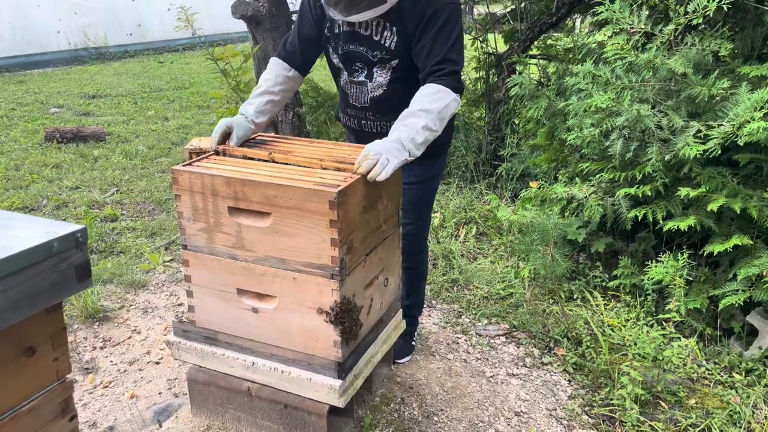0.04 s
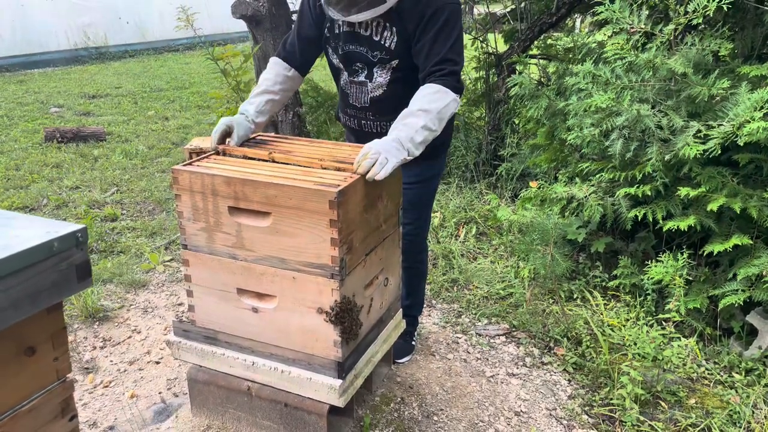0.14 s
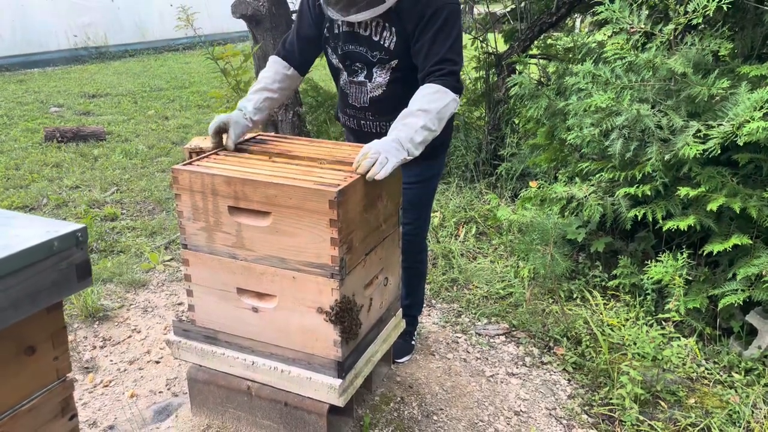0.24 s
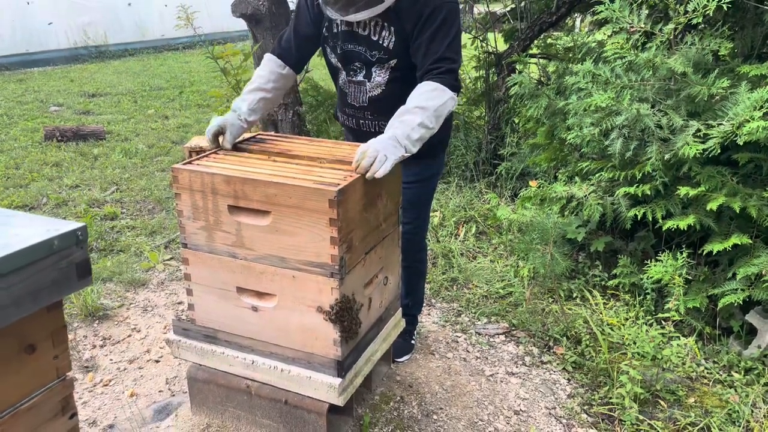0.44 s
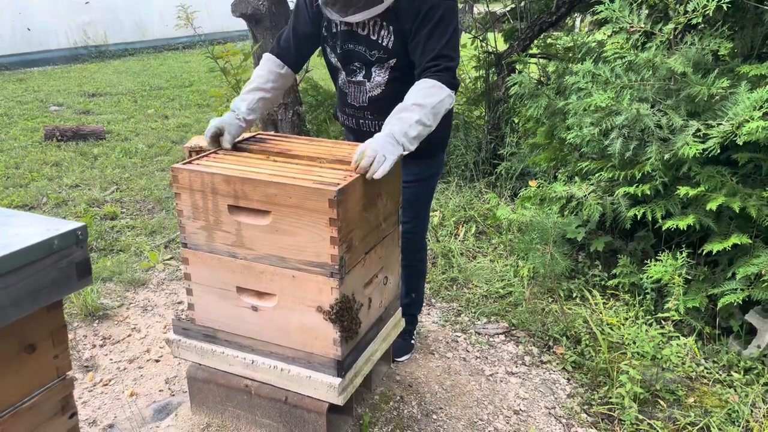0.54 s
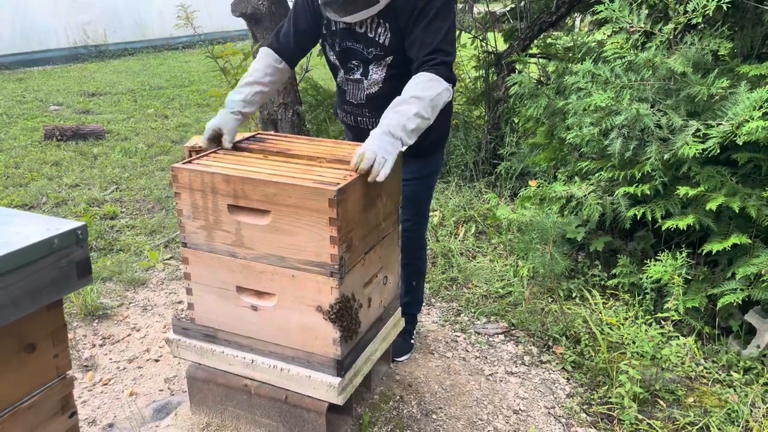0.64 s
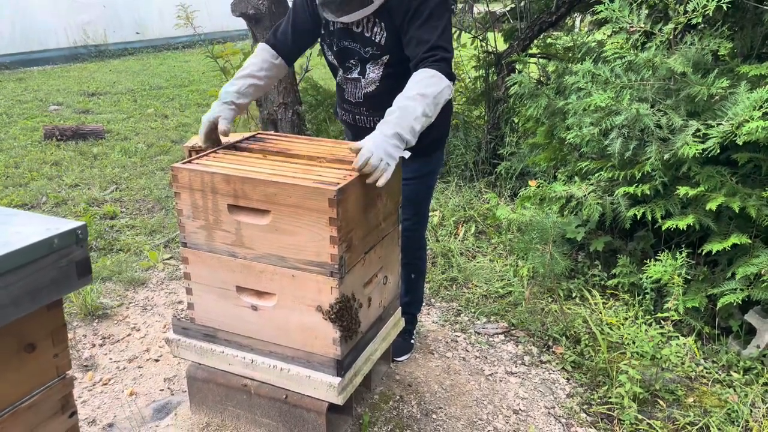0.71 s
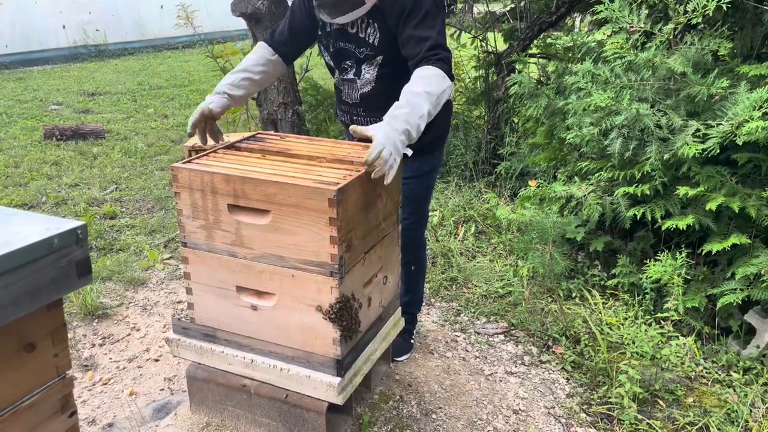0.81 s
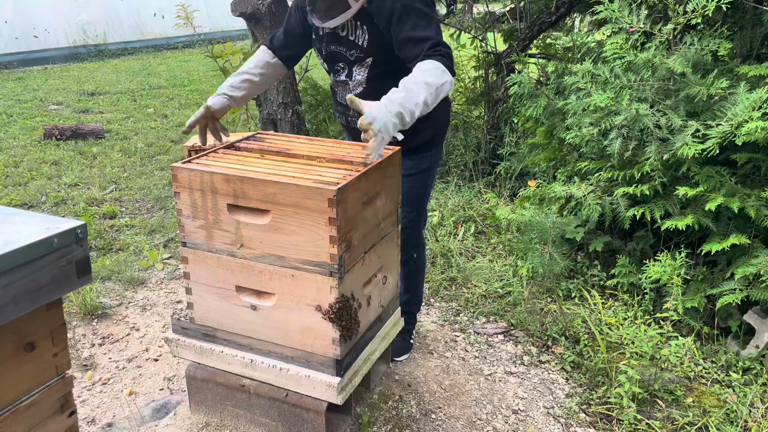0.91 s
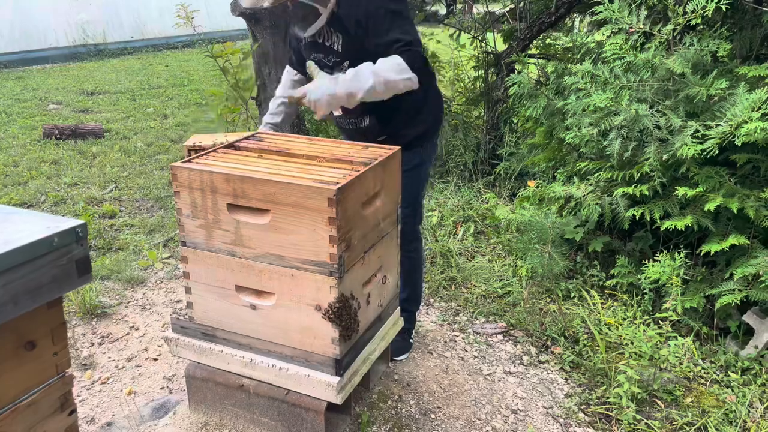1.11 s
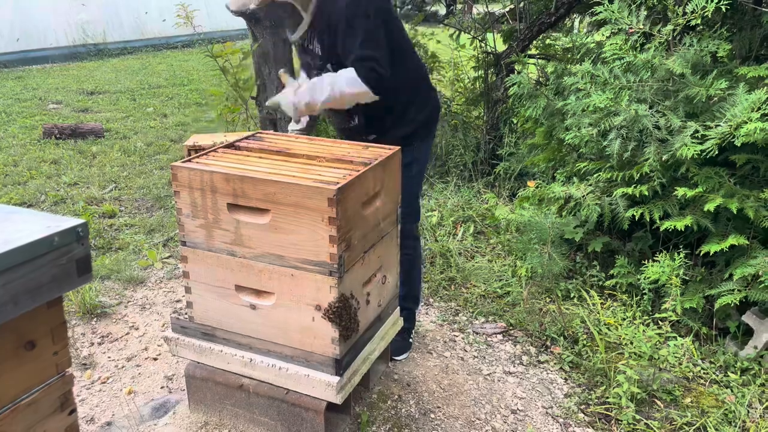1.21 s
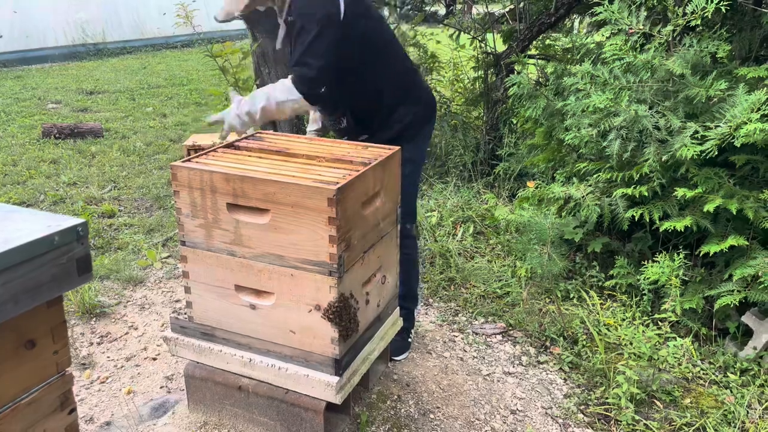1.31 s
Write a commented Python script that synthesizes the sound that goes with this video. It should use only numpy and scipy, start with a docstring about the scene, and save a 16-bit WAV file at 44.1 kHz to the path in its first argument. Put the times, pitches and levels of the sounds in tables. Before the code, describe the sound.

A dull wooden knock on a beehive, then the bees' hum swells and settles outdoors

```python
"""Bees hum around an open wooden hive, in a soft outdoor hiss with a cricket far off.
A wooden part is set down: a touch, a crack and a dull knock, then the colony's hum swells and settles.
A glove rubs, scrapes and bumps over the wood, and sticky frames tick and tap.
Bees are stacks of wandering overtones, wood is short fading tones, and the hiss, the breeze, the rubbing
and the ticks are filtered noise. The cricket is a row of short falling whistles."""
import sys
import numpy as np
from scipy import signal
from scipy.fft import rfft, irfft
from scipy.io import wavfile
from scipy.ndimage import uniform_filter1d, map_coordinates

SR = 44100
rng = np.random.default_rng(int(sys.argv[2]) if len(sys.argv) > 2 else 0)


def master_out(mix):
    """Clip the mix to full scale and print it as 16-bit PCM to the path in sys.argv[1]."""
    frames = np.transpose(np.atleast_2d(mix))
    ceiling = np.clip(frames, -1, 1)
    pcm = np.round(ceiling * 32767).astype(np.int16)
    wavfile.write(sys.argv[1], SR, pcm)


N = 59535
T = np.arange(N) / SR
FREQS = np.fft.rfftfreq(2 * N, 1 / SR)

# when the wooden part first touches the hive [s]
TOUCH_S = 0.2245
# overtones of the bees on the frames: (multiple of the wingbeat, level [dB])
COLONY_OVERTONES = [(1, 3), (2, -21.5), (3, -25), (4, -25), (5, -22.5), (7, -24), (12, -42), (20, -50)]


def amp(db):
    """Turns decibels into gain."""
    return 10 ** (np.asarray(db) / 20)


def unit(x):
    """Scales to an rms of one."""
    return x / np.sqrt(np.mean(x ** 2) + 1e-20)


def read(points, hz, axis=1):
    """Reads a column of a table, with the first column on a logarithmic axis."""
    p = np.transpose(points)
    return np.interp(np.log(hz + 1), np.log(p[0] + 1), p[axis])


def curve(points, axis=1):
    """Reads a column of a table over time."""
    p = np.transpose(points)
    return np.interp(T, p[0], p[axis])


def pan(db):
    """Gains of left and right that differ by this many decibels; positive is louder on the left."""
    return amp([[db / 2], [-db / 2]])


def drift(knots_per_s):
    """Smooth random wandering through chance values, with an rms of about one."""
    knots = rng.standard_normal(200)
    places = 10 + T[::100] * knots_per_s
    # each value is held for 100 samples
    return map_coordinates(knots, [places], order=3, mode="wrap").repeat(100)[:N]


def colour(x, tone, tilt_db=0):
    """Filters by a spectrum in dB, tilted toward the treble; the filter's own gain has an rms of one."""
    gain = amp(read(tone, FREQS) + tilt_db * np.log2(1 + FREQS / 1000))
    return irfft(rfft(x, 2 * N) * unit(gain))[:N]


def ports(pair):
    """Mixes two unrelated sounds into one diffuse sound at two microphone ports, by likeness and phase."""
    # (pitch [Hz], likeness of the two ports [0-1], phase by which left leads [rad])
    likeness = [(60, 0.96, -0.2), (290, 0.94, -0.35), (640, 0.83, 0.16), (1420, 0.61, 0.2),
                (2970, 0.36, 0.87), (4500, 0.6, 0), (6130, 0.33, 0), (7700, 1, -3), (8870, 1, -3.5),
                (10260, 0.72, -5.5), (12000, 1, -6.5), (12800, 0.71, -8.5), (14400, 0.8, -10),
                (16000, 0.85, -9.5)]
    left, other = rfft(np.array(pair), 2 * N)
    same = np.clip(read(likeness, FREQS), -1, 1)
    right = same * left + np.sqrt(1 - same ** 2) * other
    right = right * np.exp(-1j * read(likeness, FREQS, axis=2))
    return irfft(np.array([left, right]))[:, :N]


def direct(x):
    """Sound straight from the hive, a little to the right: it reaches the left port later."""
    left_lag_s = 0.00016
    turn = np.exp(np.pi * 1j * FREQS * left_lag_s * np.array([[-1], [1]]))
    return irfft(rfft(x, 2 * N) * turn)[:, :N]


def air():
    """Outdoor hiss: filtered noise with faint patches that drift in time and pitch."""
    # spectrum: (pitch [Hz], relative level [dB per Hz])
    hiss_tone = [(20, -37), (32, -17), (48, -5), (70, -0.5), (130, -2.5), (280, -4), (420, 1), (650, -4),
                 (1000, 0), (1700, -6), (2800, -8), (4500, -9), (7000, -13.5), (8300, -8.5), (9300, -15),
                 (11700, -16), (13500, -19), (14300, -25), (15700, -35)]
    # lean to one side: (pitch [Hz], left minus right [dB])
    lean = [(500, -0.5), (1600, -1.5), (2100, 2), (3000, 4.5), (4300, -0.5), (6000, 0), (12000, -0.5)]
    level_db, patchy_db = -57.5, 1.5
    z = signal.stft(rng.standard_normal((2, N)), nperseg=512)[2]
    patches = uniform_filter1d(rng.standard_normal(z.shape[1:]), size=12, axis=0)
    patches = unit(uniform_filter1d(patches, size=8, axis=1))
    hiss = signal.istft(z * amp(patchy_db * patches), nperseg=512)[1][:, :N]
    pair = ports([unit(colour(h, hiss_tone)) for h in hiss])
    side_db = read(lean, FREQS)
    leaning = rfft(pair, 2 * N) * amp([side_db / 2, -side_db / 2])
    return amp(level_db) * irfft(leaning)[:, :N]


def breeze():
    """Faint rumble of moving air: low filtered noise under a changing level."""
    # (time [s], level [dB])
    levels = [(0, -84), (.5, -74), (.75, -69.5), (1.0, -71), (1.27, -66.5), (1.35, -72)]
    # spectrum: (pitch [Hz], relative level [dB per Hz])
    rumble_tone = [(15, -33), (32, -19), (52, -2.5), (75, -1.5), (120, -2.5), (170, -15), (400, -36),
                   (16000, -88)]
    noise = rng.standard_normal((2, N))
    return amp(curve(levels)) * ports([unit(colour(n, rumble_tone)) for n in noise])


def cricket():
    """Each wing stroke is a short, slightly falling and fluttering whistle."""
    # wing strokes: (start [s], peak level before panning [dB], pitch offset [Hz], length [s])
    strokes = [(0.109, -62, -89, .028), (0.14, -61, 1.5, 0.028), (0.16, -64, -120, 0.022),
               (0.179, -59, 19, 0.024), (0.468, -61, -10, 0.026), (0.502, -59, 31, 0.027),
               (0.538, -65.5, 41, 0.026), (0.793, -61.5, -20, 0.034), (.830, -59.5, 10.5, 0.034),
               (0.868, -58.5, 11, 0.028), (1.13, -68, -200, .028), (1.167, -64, -120, .024),
               (1.201, -65.5, 1, .026), (1.271, -63.5, -11, .028), (1.304, -59.5, -2, 0.035)]
    pitch_hz, fall_hz_per_s, flutter_hz, side_db = 5095, 3600, 60, -6.5
    out = np.zeros(N)
    for start, db, offset, length in strokes:
        t = np.clip(T - start, 0, length)
        hz = pitch_hz + offset - fall_hz_per_s * t + flutter_hz * drift(260)
        whistle = np.sin(2 * np.pi * np.cumsum(hz) / SR)
        out += amp(db) * np.sin(np.pi * t / length) * whistle
    return out * pan(side_db)


def swarm(hz, tone, spread, wander, swell_db, count):
    """Each bee is a stack of wingbeat overtones that wanders in pitch and level."""
    out = np.zeros(N)
    # the bees are spread evenly around the middle pitch
    for offset in np.linspace(-1, 1, count):
        pitch = hz * (1 + spread * offset + wander * drift(11))
        phase = 2 * np.pi * np.cumsum(pitch) / SR
        buzz = np.zeros(N)
        for k in range(1, 17):
            buzz += amp(read(tone, k)) * np.cos(k * phase + 2 * np.pi * rng.random())
        out += buzz * amp(swell_db * drift(5.9))
    return unit(out)


def bees():
    """Bees in the air hum on at one level; those on the frames swell in answer to the knock."""
    # overtones of the flying bees: (multiple of the wingbeat, level [dB])
    flyer_overtones = [(1, -3), (2, -0.5), (3, -5.5), (4, -5.5), (5, -4.5), (7, -11), (12, -16), (20, -32)]
    # hum of the bees on the frames: (time [s], wingbeat [Hz], level [dB])
    hum = [(0, 231.8, -68.5), (.23, 239.8, -68), (.3, 225, -56), (.35, 245, -57), (.41, 255, -62),
           (.46, 225, -62), (.52, 240, -63), (.57, 245, -59), (.61, 222, -60), (.65, 248, -62),
           (.74, 235, -64), (.8, 245, -69.5), (1.35, 235, -74.5)]
    flyer_hz, flyers_db = 227.36, -65.5
    # spread and wander are shares of the wingbeat pitch
    flyers = ports([swarm(flyer_hz, flyer_overtones, spread=0.11, wander=0.035, swell_db=3.5, count=12)
                    for _ in range(2)])
    colony = swarm(curve(hum), COLONY_OVERTONES, spread=0.09, wander=0.06, swell_db=2.5, count=4)
    return amp(flyers_db) * flyers + amp(curve(hum, axis=2)) * colony


def buzzes():
    """Single bees swell briefly out of the hum, each a gliding stack of five overtones."""
    # (middle [s], length [s], wingbeat in the middle [Hz], glide [Hz per s], level of the lowest tone [dB])
    swells = [(.305, .09, 277, -450, -44), (.335, .06, 362, -400, -55), (.39, .07, 328, -700, -57),
              (.412, .08, 249, -200, -50), (.44, .06, 360, -150, -54), (.455, .06, 212, -250, -48),
              (.515, .07, 234, 450, -50.5), (.56, .06, 200, 500, -55), (.587, .06, 243, -150, -49),
              (.6, .06, 478, -500, -61), (.645, .06, 252, -250, -56), (.73, .06, 257, 200, -55),
              (.735, .11, 475, -250, -62), (1.05, .06, 229, 0, -59), (1.157, .055, 232, 0, -57)]
    wander = 0.05  # share of the pitch
    out = np.zeros(N)
    for middle, length, hz, glide, db in swells:
        t = np.clip(T - middle, -length / 2, length / 2)
        pitch = (hz + glide * t) * (1 + wander * drift(60))
        phase = 2 * np.pi * (np.cumsum(pitch) / SR + rng.random())
        tone = np.zeros(N)
        for k in range(1, 6):
            overtone_db = read(COLONY_OVERTONES, k) - read(COLONY_OVERTONES, 1)
            tone += amp(overtone_db) * np.sin(k * phase)
        out += amp(db) * np.cos(np.pi * t / length) * tone
    return out


def rub():
    """A glove rubs on wood: many tiny random slips, coloured by a filter."""
    # (time [s], level [dB])
    levels = [(0, -74), (.45, -78), (.56, -61), (.66, -60), (.725, -57), (.77, -60.5), (.8, -69.5),
              (1.35, -83)]
    # spectrum: (pitch [Hz], relative level [dB per Hz])
    wood_tone = [(60, -23), (400, -4), (750, -1), (1080, 1.5), (1500, -8), (2500, -12.5), (6000, -22.5),
                 (16000, -36)]
    slips_per_s = 1500
    slipping = rng.random((2, N)) < slips_per_s / SR
    slips = rng.standard_normal((2, N)) * slipping
    return ports([unit(colour(s, wood_tone)) for s in slips]) * amp(curve(levels))


def scuffs():
    """The glove bumps softly in short tones, before and after sliding with a falling whistle."""
    # slides: (start [s], length [s], first pitch [Hz], last pitch [Hz], peak level [dB])
    slides = [(.7105, .013, 1450, 130, -46), (.710, .008, 2600, 1950, -50)]
    # soft bumps of the glove before and after the slides: (time [s], pitch [Hz], level [dB])
    thuds = [(.6935, 1100, -51), (.7285, 1010, -50), (.739, 948, -54), (.7455, 560, -51.5),
             (.7655, 750, -48.5), (.774, 380, -50)]
    bump_width_s = 0.003
    out = np.zeros(N)
    for start, length, first_hz, last_hz, db in slides:
        u = np.clip((T - start) / length, 0, 1)
        hz = first_hz + (last_hz - first_hz) * u
        out += amp(db) * np.sin(np.pi * u) * np.sin(2 * np.pi * np.cumsum(hz) / SR)
    for middle, hz, db in thuds:
        t = T - middle
        out += amp(db) * np.exp(-(t / bump_width_s) ** 2) * np.sin(2 * np.pi * hz * t)
    return direct(out)


def ticks():
    """Sticky frames snap: fading bursts of filtered noise, partly direct and partly scattered."""
    # (time [s], level [dB], decay [s], brightness [dB per octave], left minus right [dB])
    snaps = [(0.048, -49.5, 0.0046, -6, 3), (.071, -48.5, 0.0069, -7.5, 2), (0.1465, -38, 0.00097, 0, .5),
             (.148, -49.5, 0.0045, -6.5, 2), (0.1898, -52, 0.012, -8, -1), (0.222, -53, 0.0014, -3, 2),
             (0.638, -56, .003, -4, 1), (0.713, -55, 0.002, -9, 6), (0.7517, -48, 0.0025, -8.5, 3),
             (0.8965, -50.5, 0.00094, 7, 2), (1.0934, -48.5, 0.0024, -4, 4),
             (1.100, -49.5, 0.0029, 3.5, 10.5), (1.104, -44.5, 0.0029, 14, -2), (1.129, -48, 0.0014, 5, 6),
             (1.136, -55, 0.0035, 6, .5), (1.2447, -48.5, 0.0016, 1, 7), (1.248, -44, 0.0016, 1.5, 7)]
    # spectrum: (pitch [Hz], relative level [dB per Hz])
    snap_tone = [(100, -19), (900, -8.5), (1700, -3), (2500, -1.5), (3200, 0), (4200, -3), (5800, -0.5),
                 (8000, -4), (11500, -4.5), (16000, -17)]
    direct_share = 0.32  # of the power
    out = np.zeros((2, N))
    for start, db, decay, bright_db, side_db in snaps:
        fade = (T >= start) * np.exp(-np.maximum(T - start, 0) / decay)
        bursts = fade * rng.standard_normal((3, N))
        near, *far = [colour(b, snap_tone, bright_db) for b in bursts]
        mix = np.sqrt(direct_share) * direct(near) + np.sqrt(1 - direct_share) * ports(far)
        out += amp(db) * pan(side_db) * mix
    return out


def taps():
    """Frames tap each other: each tap is a brief, rough ring whose phase wanders quickly."""
    # (time [s], pitch [Hz], level [dB], decay [s])
    rings = [(.046, 3050, -53, .006), (.069, 3220, -50, .007), (.191, 1950, -50, .01),
             (.203, 1700, -53, .006), (1.093, 2500, -54, .008), (1.247, 3500, -53, .004)]
    out = np.zeros(N)
    for start, hz, db, decay in rings:
        t = np.maximum(T - start, 0)
        ring = np.sin(2 * np.pi * hz * t + drift(140))
        out += amp(db) * np.exp(-t / decay) * ring * (T >= start)
    return direct(out)


def clack():
    """The light wooden part cracks against the box in a fast falling chirp and rings briefly."""
    # ringing of the part: (pitch [Hz], starting level [dB], time to fall by 60 dB [s])
    part_modes = [(530, -41, 0.045), (780, -43, 0.038), (1000, -35, .035), (1354, -46.5, .025),
                  (2046, -38, 0.029), (2470, -40, 0.026), (3100, -43, .022)]
    part_rise_s = 0.0028
    crack_s, crack_width_s, crack_db = 0.2272, 0.002, -40
    crack_hz, crack_fall_hz_per_s = 2850, 220000
    t = np.maximum(T - TOUCH_S, 0)
    ring = sum(amp(db - 60 * t / t60) * np.sin(2 * np.pi * hz * t) for hz, db, t60 in part_modes)
    u = T - crack_s
    chirp = np.sin(2 * np.pi * (crack_hz - crack_fall_hz_per_s * u / 2) * u)
    crack = amp(crack_db) * np.exp(-(u / crack_width_s) ** 2) * chirp
    return direct(np.minimum(t / part_rise_s, 1) * ring + crack)


def knock():
    """A noisy touch, a short low thump, the ringing tones of the box and a fading noisy murmur in it."""
    # ringing of the hive box: (pitch [Hz], starting level [dB], time to fall by 60 dB [s])
    box_modes = [(72.8, -57.5, 0.33), (138.4, -39.5, 0.25), (175.5, -17.5, 0.043), (210.5, -24, 0.13),
                 (244, -25.5, 0.15), (265, -22.5, 0.073), (311.7, -32.5, 0.21), (344.8, -23, .095),
                 (514, -54, 0.15), (956, -55, 0.095)]
    # spectra of the touch and the murmur: (pitch [Hz], relative level [dB per Hz])
    touch_tone = [(100, -5), (600, -4), (1000, -4), (1450, -11), (2500, -10), (5000, -19), (16000, -41)]
    murmur_tone = [(30, -37), (70, -9), (130, -8), (170, -9), (215, 1), (300, -3.5), (375, -1), (440, -24),
                   (800, -47), (16000, -85)]
    thump_s, thump_hz, thump_db, thump_width_s = 0.2328, 281, -14.5, 0.0041
    box_s, box_rise_s = 0.231, 0.012
    touch_db, touch_rise_s, touch_decay_s = -49, 0.0029, 0.0059
    murmur_db, murmur_fade_db_per_s = -52, 34
    side_db = 0.9

    t = T - thump_s
    thump = -amp(thump_db) * np.exp(-(t / thump_width_s) ** 2) * np.sin(2 * np.pi * thump_hz * t)

    after = np.maximum(T - box_s, 0)
    rise = np.minimum(after / box_rise_s, 1)
    ring = sum(amp(db - 60 * after / t60) * np.sin(2 * np.pi * hz * after) for hz, db, t60 in box_modes)

    since = np.maximum(T - TOUCH_S, 0)
    press = np.minimum(since / touch_rise_s, 1)
    press = press * np.exp(-np.maximum(since - touch_rise_s, 0) / touch_decay_s)
    linger = rise * amp(murmur_db - murmur_fade_db_per_s * after)
    scattered = []
    for _ in range(2):
        touch = amp(touch_db) * press * colour(rng.standard_normal(N), touch_tone)
        murmur = linger * colour(rng.standard_normal(N), murmur_tone)
        scattered.append(touch + murmur)
    return direct(thump + rise * ring) * pan(side_db) + ports(scattered)


def scene():
    """The garden, the bees, the glove and frames, and the part set down on the hive."""
    garden = air() + breeze() + cricket()
    hive = bees() + buzzes()
    handling = rub() + scuffs() + ticks() + taps()
    return garden + hive + handling + clack() + knock()


def record(dry):
    """A steep low-pass filter takes away the highest treble."""
    edge_hz = 15780
    low_pass = signal.firwin(511, edge_hz, window=("kaiser", 9), fs=SR)
    return signal.oaconvolve(dry, low_pass[None], "same")


dry = scene()
out = record(dry)
master_out(out)
```